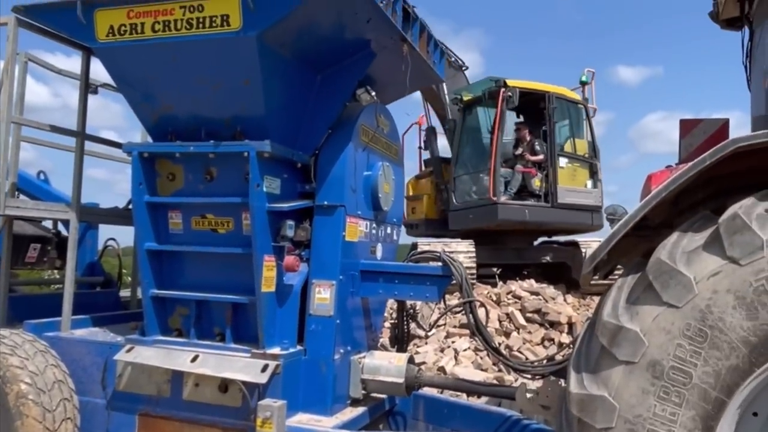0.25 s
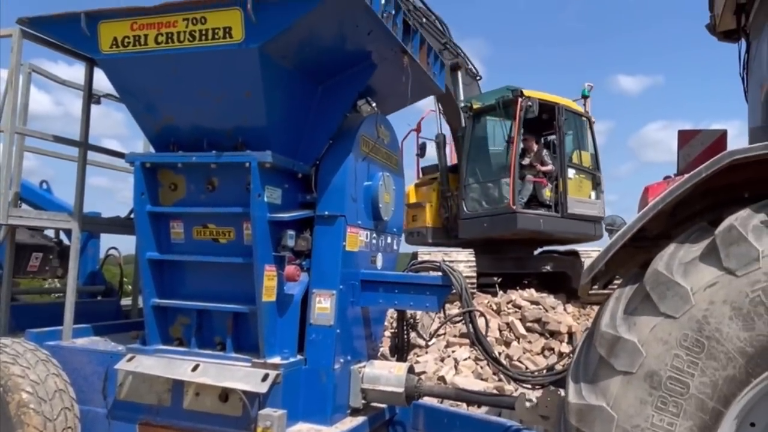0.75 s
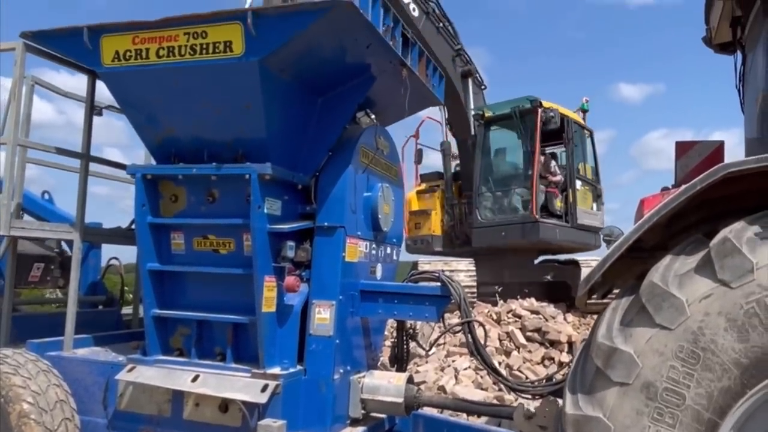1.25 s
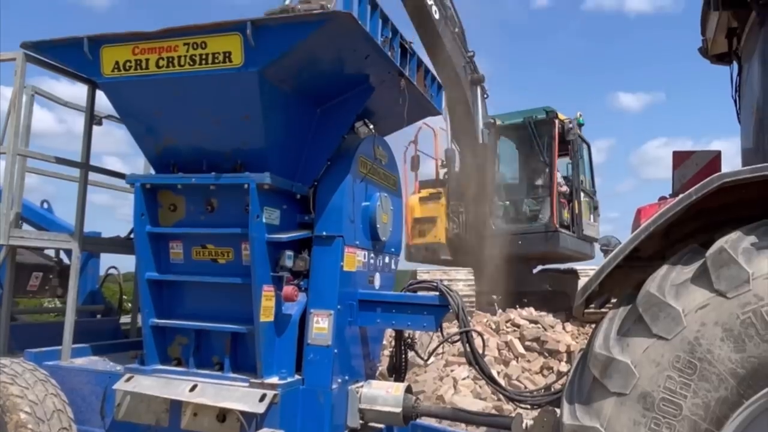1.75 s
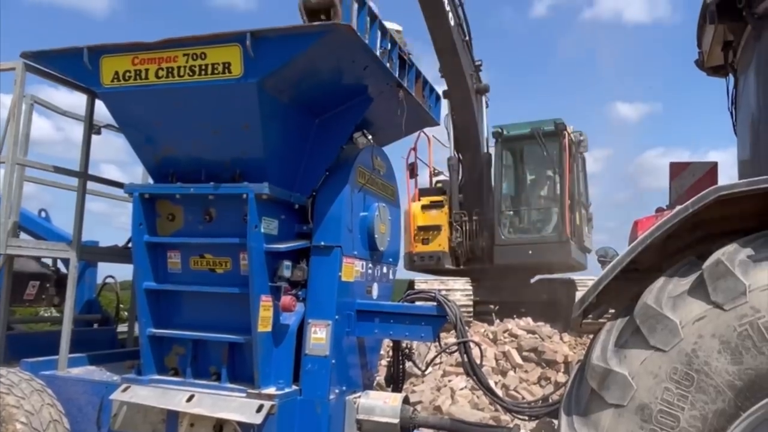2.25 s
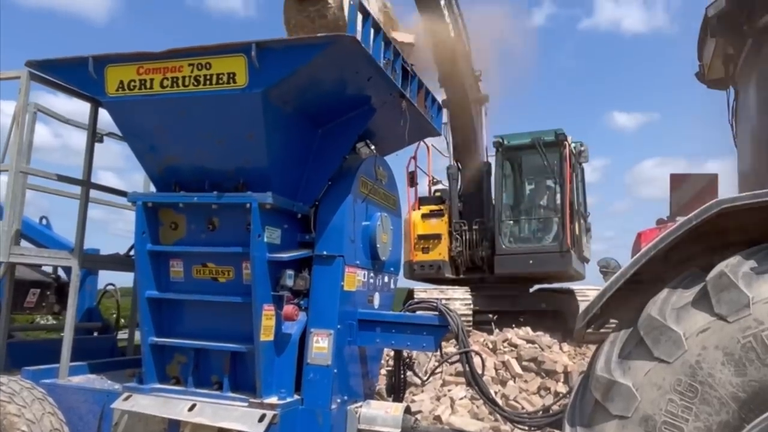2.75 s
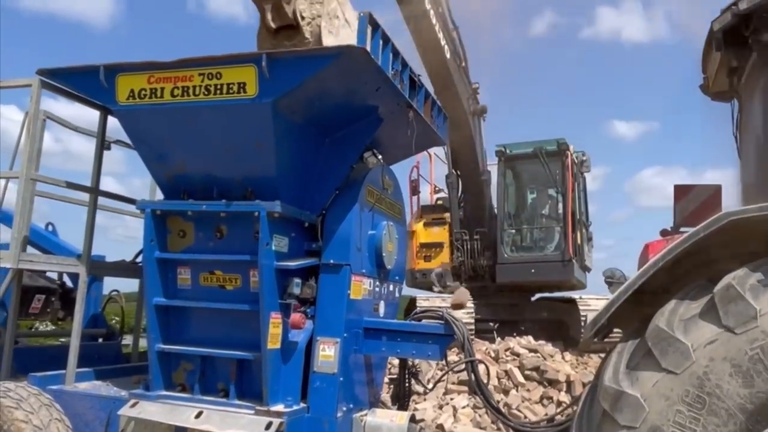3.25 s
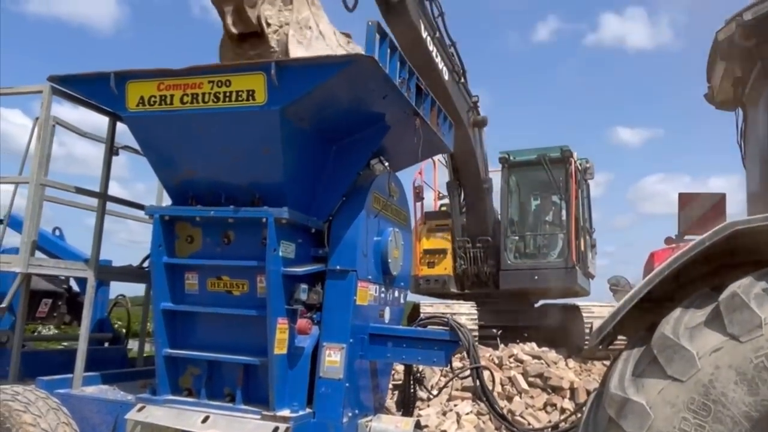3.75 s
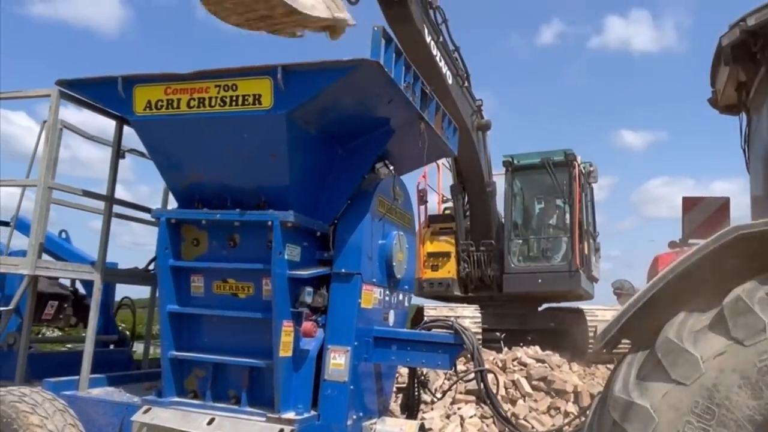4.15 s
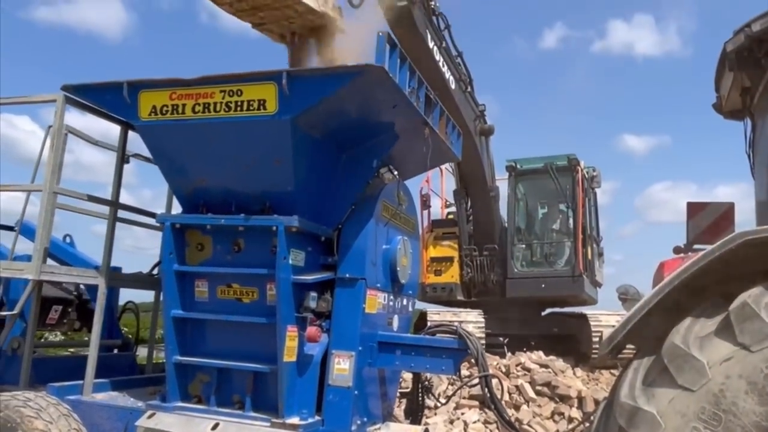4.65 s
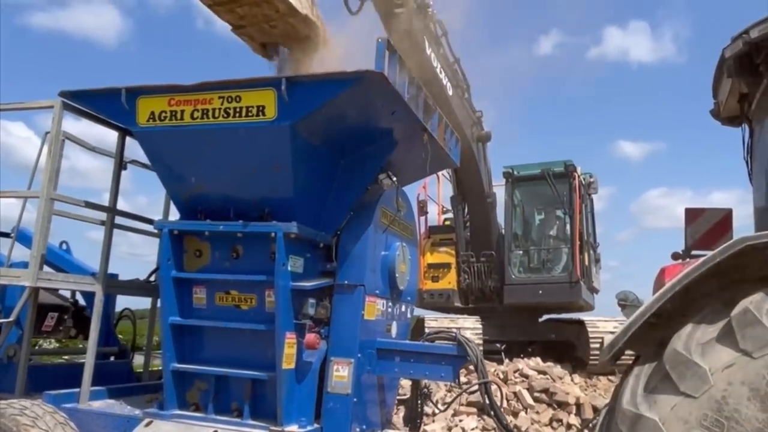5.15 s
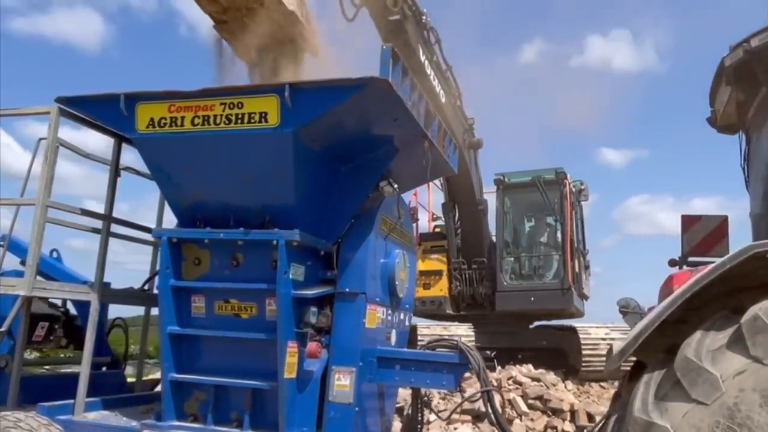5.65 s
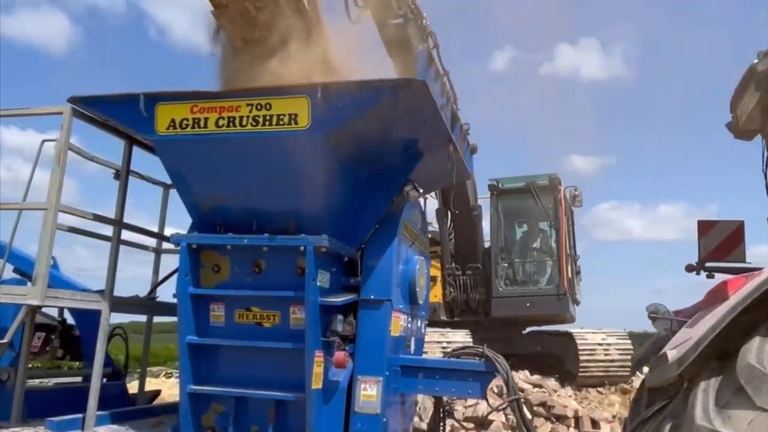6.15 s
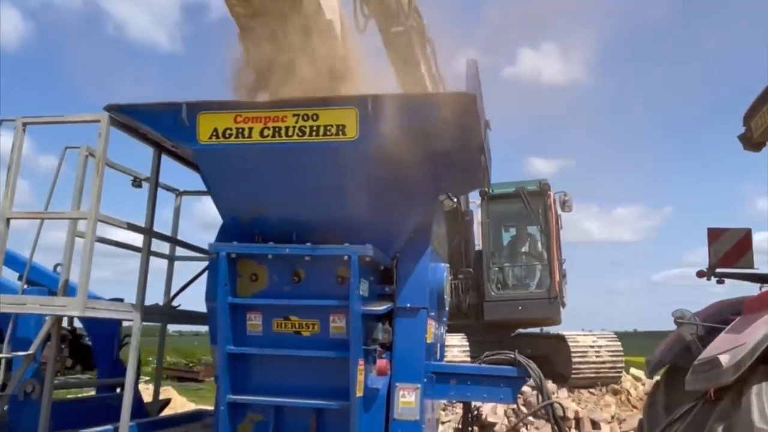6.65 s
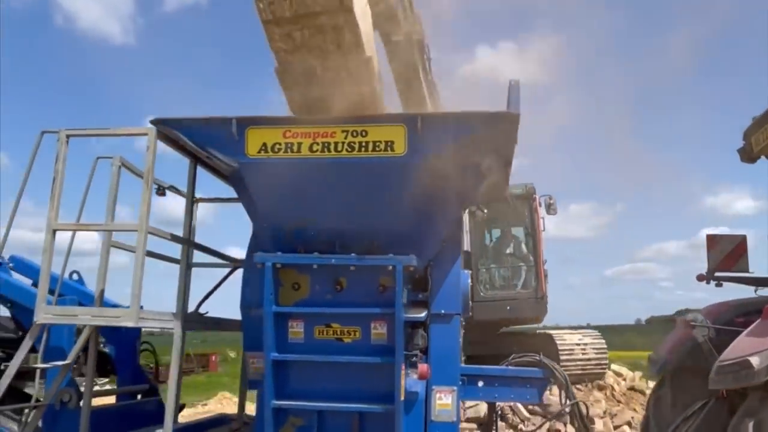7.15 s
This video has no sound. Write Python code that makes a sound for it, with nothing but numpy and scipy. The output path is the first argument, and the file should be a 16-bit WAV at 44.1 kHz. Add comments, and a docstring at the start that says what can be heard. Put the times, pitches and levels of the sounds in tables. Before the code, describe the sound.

Close outdoor stereo capture of a tractor-driven crusher in a farmyard. Engine drone and humming steel frame underlie grinding, dull thuds and splintering stone in a quick regular beat. An excavator bucket adds rubble: sharp stone-on-steel clangs near three seconds, scattered cracks and grit afterwards, then a thicker pour and two short metallic booms late on, as the chamber rumble thins out.

```python
"""A diesel drones and throbs as a tractor-driven crusher chews stone and brick rubble in a farmyard.
Rubble churns in the steel chamber and bursts at strokes of the jaw: noise shaped by collisions and resonances.
An excavator refills the hopper: grit patters in, stones crack against the steel, chips tick and a stone squeaks.
Two heavy blocks set the hopper walls booming in decaying modes. All is heard through two close microphone ports."""
import sys
import numpy as np
from scipy import signal
from scipy.fft import rfft, irfft, next_fast_len
from scipy.io import wavfile

SR = 44100
rng = np.random.default_rng(int(sys.argv[2]) if len(sys.argv) > 2 else 0)


def master(y):
    """Save y as 16-bit WAV."""
    cut = np.clip(np.atleast_2d(y).T, -1, 1)
    pcm = np.round(cut * 32767)  # scale
    wavfile.write(sys.argv[1], SR, pcm.astype(np.int16))


N = 326781
TIME = np.arange(N) / SR  # seconds
BINS = np.fft.rfftfreq(8192, 1 / SR)  # Hz, grid on which colours are drawn
FIRST_CLOSE_S, STROKE_S = .095, .2138  # the jaw closes at a steady beat

# load in the chamber: (time [s], relative frame rumble [dB], relative grinding [dB])
LOAD_CURVE = [(0, -24, -24), (1.1, -24, -27), (2.35, -23.5, -25), (2.95, -27.5, -26.5), (3.3, -33.5, -29),
              (3.75, -29, -28), (4.2, -33, -33.5), (4.48, -28.5, -27), (4.72, -24, -25), (5.7, -24.5, -27),
              (6.3, -22.5, -25.5), (6.58, -28, -23), (6.82, -35, -28.5), (7.0, -34.5, -29),
              (7.41, -43, -27)]
# grit pouring from the bucket: (time [s], relative level [dB])
POUR_CURVE = [(0, -40.5), (1.1, -43), (2.55, -41.5), (3.07, -46.5), (3.29, -40), (3.38, -38), (3.95, -48),
              (4.27, -49.5), (4.72, -41.5), (4.85, -35.5), (5.2, -37), (5.55, -42), (6.12, -40),
              (6.28, -30.5), (6.48, -37), (6.68, -34), (6.85, -52), (7.12, -37), (7.41, -44)]
# resonances of the crushing chamber: (frequency [Hz], width [Hz], lift [dB])
CHAMBER_MODES = [(129, 12, 3), (160, 14, -3), (186, 12, 5), (250, 16, -3), (284, 22, 4), (325, 14, 3),
                 (345, 16, -3), (374, 18, 2), (405, 14, -3), (432, 14, 3), (460, 16, -2), (502, 36, 6),
                 (925, 24, -4), (965, 20, -3), (716, 10, 6), (825, 16, 4), (884, 30, 7), (1040, 40, 2),
                 (1378, 30, 3), (1445, 30, 3), (2851, 40, 4), (3009, 25, 4), (3193, 28, 4), (3521, 40, 4),
                 (4240, 40, 4), (4694, 55, 5), (5954, 110, 3), (10609, 80, 3)]
STEEL_DB = sum(db / (1 + (2 * (BINS - hz) / width) ** 2) for hz, width, db in CHAMBER_MODES)


def amp(db):
    """Level to amplitude: 20 dB is a factor of ten."""
    return 10 ** (np.asarray(db) / 20)


def evened(x):
    """Normalization: scales a signal to an rms of one."""
    return x / np.sqrt(np.mean(x ** 2) + 1e-20)


def read(points, hz):
    """Interpolates a spectrum linearly on a log-frequency axis."""
    f, value = np.transpose(points)
    return np.interp(np.log(hz + 1), np.log(f + 1), value)


def follow(rows, column=1):
    """Interpolates one column of a time curve at every sample."""
    rows = np.asarray(rows)
    return np.interp(TIME, rows[:, 0], rows[:, column])


def add(mix, s, sound):
    """Superposition: adds a sound to the mix from time s."""
    part = mix[..., max(round(s * SR), 0):][..., :sound.shape[-1]]
    part += sound[..., :part.shape[-1]]


def dying(t, t60):
    """Free decay: amplitude falls exponentially by 60 dB in t60 seconds."""
    return np.exp(-np.log(1000) * np.maximum(t, 0) / max(t60, .005))


def wander(top_hz, count=1024):
    """Low-passed random fluctuation with an rms of one, weak above top_hz."""
    length = N / SR
    low_pass = 1 + (np.fft.rfftfreq(count, length / count) / top_hz) ** 4
    slow = irfft(rfft(rng.standard_normal(count)) / low_pass)
    return np.interp(TIME, np.linspace(0, length, count), evened(slow))


def impacts(per_s, spread_db, t60):
    """Shot noise: power (mean one) of random collisions of unequal size, each decaying exponentially."""
    sizes = amp(spread_db * np.minimum(rng.exponential(1, N), 4))
    hits = (rng.random(N) < per_s / SR) * sizes ** 2
    power = signal.lfilter([1], [1, -amp(-60 / (t60 * SR)) ** 2], hits)
    return power / power.mean()


def rattle(power, spectrum, lift_db):
    """Source and filter: independent noise at both ports follows a power curve through a causal resonant filter."""
    # folding the cepstrum gives the minimum-phase response
    cepstrum = irfft(np.log(amp(read(spectrum, BINS) + lift_db)))
    half = len(BINS) - 1
    cepstrum[1:half] *= 2
    cepstrum[half + 1:] = 0
    response = irfft(np.exp(rfft(cepstrum)))[:half]
    response /= np.linalg.norm(response)
    noise = rng.standard_normal((2, len(power))) * np.sqrt(np.maximum(power, 0))
    return signal.oaconvolve(noise, response[None], axes=1)[:, :len(power)]


def stone_ring(count=16):
    """Local resonance: every stone and the spot it hits lift a few bands of their own, in dB over frequency."""
    edges = np.geomspace(700, 13000, count + 1)
    lift_db, sharpness = 11.5, 30  # greatest lift; Q of each resonance
    centres = rng.uniform(edges[:-1], edges[1:])
    return sum(lift_db * rng.random() / (1 + (2 * sharpness * (BINS / hz - 1)) ** 2) for hz in centres)


def struck(modes, s, level_db, rise_s):
    """Modal superposition: a steel part rings in decaying sines after one blow."""
    t, out = np.arange(SR) / SR, np.zeros(N)
    ring = sum(amp(db) * dying(t, t60) * np.sin(2 * np.pi * (hz * t + rng.random())) for hz, db, t60 in modes)
    add(out, s, amp(level_db) * ring * (1 - np.exp(-t / rise_s)))
    return out


def clacks(low_hz, high_hz, per_s, spread_db, cycles, tilt, count=11):
    """Size scaling: colliding stones clack in three short modes, the big ones lower and louder."""
    t, out = np.arange(SR // 10) / SR, np.zeros((2, N))
    for hz in np.geomspace(low_hz, high_hz, count):
        sizes = amp(spread_db * np.minimum(rng.exponential(1, N), 3))
        hits = sizes * (rng.random(N) < per_s / SR)  # per_s holds for each size
        modes = hz * np.array([1, rng.uniform(1.2, 1.5), rng.uniform(1.6, 2.1)])[:, None, None]
        # the upper modes are weaker; each port has its own phases
        ring = (np.sin(2 * np.pi * (modes * t + rng.random((3, 2, 1)))) * hz / modes).sum(0)
        ring *= dying(t, cycles / hz) * (1 - dying(t, .003))
        out += evened(signal.oaconvolve(hits[None], ring, axes=1)[:, :N]) / hz ** tilt
    return evened(out)


def jaw(lead_s):
    """Harmonic motion: the jaw's swing lead_s ahead, 1 when closed and -1 when open."""
    return np.cos(2 * np.pi * (TIME + lead_s - FIRST_CLOSE_S) / STROKE_S)


def diesel(level_db=-2.5, jitter=0.013, overtone_flutter_db=3, throb_db=2.0, sag=0.033):
    """Fourier synthesis: exhaust overtones of an uneven firing rate throb and sag as the jaw loads the engine."""
    # firing rate before jitter and sag: (time [s], frequency [Hz])
    firing_curve = [(0, 48.43), (.9, 48.15), (1.3, 47.54), (2.1, 48.64), (3.4, 48.74), (3.9, 47.6),
                    (4.9, 48.4), (5.5, 46.37), (6.4, 47.9), (7.41, 47)]
    # exhaust drone: (time [s], relative level [dB])
    drone_curve = [(0, -24), (.28, -24), (.6, -26), (2.1, -28.5), (2.55, -27), (2.97, -29), (3.07, -43),
                   (3.65, -32), (4.8, -29), (6.55, -28), (6.79, -38), (7.14, -30.5), (7.41, -30)]
    # partials of the firing tone: (multiple of firing rate [-], relative level [dB])
    partials = [(1, 1.5), (1.5, -21), (2, -8.5), (2.5, -34), (3, -8.5), (4, -21.5), (6, -33)]
    firing_flutter_db = 1.6
    unevenness = 1 + jitter * wander(top_hz=9.9) - sag * jaw(lead_s=0.035)
    phase = 2 * np.pi * np.cumsum(follow(firing_curve) * unevenness) / SR
    tone = np.zeros(N)
    for multiple, db in partials:
        half_orders = round(2 * multiple)
        flutter_db = firing_flutter_db if half_orders == 2 else overtone_flutter_db
        gain = amp(db + flutter_db * wander(top_hz=9.3))
        tone += gain * np.sin(half_orders / 2 * phase + 2 * np.pi * rng.random())
    return amp(follow(drone_curve) + level_db + throb_db * jaw(lead_s=0.064)) * np.sqrt(2) * tone


def churn(rumble_db=1.5, grind_db=0, frame_steel=0.75, wall_steel=0.95, squeeze_db=1.0):
    """Random excitation: tumbling rubble shakes the frame and grinds along the walls, harder as the jaw closes."""
    # colour of the frame's rumble: (frequency [Hz], density [dB per Hz])
    rumble_colour = [(15, -32), (35, -16), (60, -1.5), (85, 4.5), (130, 3), (190, -4), (260, -11),
                     (400, -16.5), (1000, -73)]
    # colour of grinding on the walls: (frequency [Hz], density [dB per Hz])
    grind_colour = [(100, -21), (200, 3), (290, 1), (500, -3.5), (620, -6), (1000, -5.5), (1500, -12.5),
                    (2400, -17.5), (3400, -31.5), (6000, -34), (16000, -72)]
    rumble_gain = amp(follow(LOAD_CURVE, column=1) + rumble_db)
    rumble = rumble_gain ** 2 * impacts(per_s=110, spread_db=-0.5, t60=0.1)
    grind_gain = amp(follow(LOAD_CURVE, column=2) + grind_db + squeeze_db * jaw(lead_s=0.0079))
    grind = grind_gain ** 2 * impacts(per_s=530, spread_db=0.5, t60=0.48)
    shaking = rattle(rumble, rumble_colour, frame_steel * STEEL_DB)
    return shaking + rattle(grind, grind_colour, wall_steel * STEEL_DB)


def frame(level_db=0, waver=0.58):
    """Sustained resonance: shaking keeps the frame humming in lightly damped modes that waver in level and phase."""
    # modes of the frame: (frequency [Hz], relative level [dB])
    frame_modes = [(75, -11), (105, -10.5), (120, -16.5), (131, -10.5), (148, -10), (170, -14), (186, -9),
                   (296, -13.5), (328, -18.5), (387, -15.5), (433, -13.5), (480, -22), (506, -17)]
    hum = np.zeros(N)
    for hz, db in frame_modes:
        envelope = 1 + waver * (wander(top_hz=3.1) + 1j * wander(top_hz=2.3))
        hum += amp(db) * (envelope * np.exp(2j * np.pi * (hz * TIME + rng.random()))).real
    return amp(follow(LOAD_CURVE, column=1) + level_db) * hum


def pebbles(level_db=-9.5):
    """Discrete collisions: single pebbles clack as they bounce out of the mass in the chamber."""
    clacking = clacks(low_hz=649, high_hz=2600, per_s=7, spread_db=2.0, cycles=53, tilt=1.0)
    return amp(follow(LOAD_CURVE, column=2) + level_db) * clacking


def pour(level_db=4.0, steel=0.15, gravel_db=-5.5):
    """Granular excitation: sand and chips patter on the hopper's steel while gravel clacks among them."""
    # colour of grit on steel: (frequency [Hz], density [dB per Hz])
    grit_colour = [(800, -14.5), (2000, 4.5), (2900, 7), (3400, 0.5), (5500, 2.5), (6600, -3), (9000, -3),
                   (11000, -7.5), (12800, -11.5), (16000, -17)]
    grains = impacts(per_s=1500, spread_db=1.5, t60=0.055)
    gravel = clacks(low_hz=1400, high_hz=5000, per_s=6, spread_db=2.5, cycles=70, tilt=.5, count=16)
    gain = amp(follow(POUR_CURVE) + level_db)
    return rattle(gain ** 2 * grains, grit_colour, steel * STEEL_DB) + gain * amp(gravel_db) * gravel


def hopper(hum_db=-4):
    """Modal response: blocks boom the wall, stones clang on the rim, and pouring grit keeps the wall humming."""
    # blocks landing on the wall: (time [s], level [dB], rise time constant [s])
    blocks = [(6.626, -13, 0.0043), (7.121, -14, 0.0038)]
    # modes of the wall: (frequency [Hz], relative level [dB], t60 [s])
    wall_modes = [(168.6, -3, 1.27), (176.3, -5, 0.66), (196.6, 8.5, 0.17), (214.8, 1, 0.52),
                  (264, -8, 1.24), (276, -9.5, 1.1), (331, -15, 2.3), (419, -4, 0.56), (487, -18, 0.62),
                  (560, -7, 0.18), (600, -3, .3), (684, -7.5, 0.52), (910, -11, 0.44), (950, -30, 1.6),
                  (1000, -23, 1.1), (1085, -14, 0.32)]
    # stones clanging on the rim: (time [s], level [dB])
    clangs = [(2.949, -13.5), (2.957, -22), (3.152, -21), (3.172, -24), (3.447, -29), (7.146, -27)]
    # modes of the rim: (frequency [Hz], relative level [dB], t60 [s])
    rim_modes = [(862, 1, .12), (922, -1, 0.12), (1167, 1, 0.077), (1250, -4, 0.07), (1370, 0, 0.054),
                 (1450, -7, 0.12), (1543, -4, 0.15), (1650, -1, 0.09), (2070, -10, 0.15), (2568, -12, 0.13),
                 (2780, -21, 0.22), (3220, -15, .22), (3440, -5, .1), (6089, -20, .12)]
    # long-lived panel tones stirred by the pour: (frequency [Hz], relative level [dB])
    panel_tones = [(186, 9.5), (283, 0.5), (371, 3), (716, -17), (887, 5)]
    booms = sum(struck(wall_modes, s, db, rise_s=rise) for s, db, rise in blocks)
    clang = sum(struck(rim_modes, s, db, rise_s=0.0003) for s, db in clangs)
    hum = sum(amp(db) * wander(top_hz=3.7) * np.sin(2 * np.pi * hz * TIME) for hz, db in panel_tones)
    return booms + clang + amp(follow(POUR_CURVE) + hum_db) * hum


def bursts(steel=1.0):
    """Brittle failure: crushed lumps and dropped heaps give swelling fracture volleys that ring on in the chamber."""
    # lumps bursting as the jaw closes, with relative levels:
    # (stroke number [-], squeeze before closing [s], thud [dB], crunch [dB], splinter [dB])
    bites = [(0, .055, -35, -20, -24.5), (1, .02, -15, -13.5, -25), (2, .06, -25, -14.5, -23.5),
             (3, .04, -22.5, -21.5, -31), (4, .035, -19, -21.5, -32), (6, .025, -20, -14.5, -37),
             (7, .032, -20.5, -13, -23), (8, 0.091, -36, -23.5, -37), (9, .03, -24, -11.5, -22.5),
             (10, .03, -25, -11.5, -26), (11, .08, -20, -20.5, -31), (12, .05, -17.5, -11.5, -22),
             (13, .05, -26, -15.5, -26), (16, .07, -23, -19.5, -22.5), (17, .04, -20, -17, -22.5),
             (19, 0.065, -25, -25.5, -31), (21, .045, -12, -15, -19.5), (22, 0.046, -18, -20, -31),
             (23, 0.036, -34, -22.5, -32), (24, 0.029, -22.5, -15.5, -21), (25, .026, -14, -10.5, -19.5),
             (26, .044, -22, -18, -24), (27, .025, -25, -23, -29), (28, 0.052, -15.5, -19.5, -32),
             (29, .08, -17.5, -17, -22.5), (30, .036, -19, -14.5, -39), (32, 0.046, -30, -35, -34),
             (33, .085, -33, -29, -32)]
    # heaps of rubble dropping from the bucket, with relative levels:
    # (time [s], collapse [s], thud [dB], crunch [dB], splinter [dB])
    heaps = [(2.949, 0.046, -25, -13, -16.5), (6.346, 0.023, -23, -17, -16),
             (6.625, 0.017, -25, -11.5, -17.5), (7.121, 0.038, -29, -22.5, -16),
             (7.25, 0.033, -23, -19, -29)]
    # colours of thud, crunch and splintering: each (frequency [Hz], density [dB per Hz])
    thud_colour = [(30, -46.5), (60, -3), (90, 1), (190, 0), (250, -8.5), (400, -27.5), (1000, -53)]
    crunch_colour = [(120, -22.5), (180, -5), (270, -1), (480, 3.5), (640, -1.5), (880, -12.5),
                     (1300, -25.5), (4000, -50)]
    splinter_colour = [(400, -12.5), (950, 5.5), (1400, -1.5), (2000, -2), (2500, -4), (3200, -10.5),
                       (5500, -20), (9000, -42), (16000, -51)]
    t, out = np.arange(SR // 2) / SR, np.zeros((2, N))
    fractures = impacts(per_s=900, spread_db=-1.0, t60=0.067)

    def volley(db, length, t60, first):
        """Energy release: power grows from a first fraction of full amplitude, then decays after length seconds."""
        swell = first + (1 - first) * np.minimum(2 * t / length, 1)
        return (amp(db) * swell * dying(t - length, t60)) ** 2

    events = [(FIRST_CLOSE_S + round(stroke) * STROKE_S - squeeze, squeeze, *levels)
              for stroke, squeeze, *levels in bites]
    for s, length, thud_db, crunch_db, splinter_db in events + list(heaps):
        grains = np.roll(fractures, -round(s * SR))[:len(t)]
        ring_db = steel * STEEL_DB + stone_ring()
        thud = volley(thud_db - .3, length, t60=0.21, first=0.27)
        crunch = volley(crunch_db - 3.5, length, t60=0.38, first=0.67) * grains
        splinter = volley(splinter_db - 2.0, length, t60=0.28, first=0.73) * grains
        add(out, s, rattle(thud, thud_colour, ring_db))
        add(out, s, rattle(crunch, crunch_colour, ring_db))
        add(out, s, rattle(splinter, splinter_colour, ring_db))
    return out


def chips(octave_db=-10, per_s=10, faint_db=7, spread_db=3):
    """Impulsive fracture: flakes tick, each brightest at its own pitch; fainter random ones follow the grit's level."""
    # chips snapping off: (time [s], level [dB], brightest frequency [Hz])
    loud = [(.150, -28, 9000), (.486, -28, 9000), (.621, -19.5, 4000), (.750, -27.5, 5000),
            (.805, -28, 4000), (.909, -30, 3700), (1.043, -21.5, 3000), (1.145, -32, 3000),
            (1.204, -32, 3800), (1.551, -24, 2980), (1.676, -35, 3500), (1.713, -26, 7070),
            (1.850, -24.5, 6030), (1.874, -26, 4000), (2.013, -29, 5000), (2.095, -27, 10000),
            (2.112, -24, 10560), (2.129, -29, 3500), (2.309, -29, 9440), (2.557, -24, 3000),
            (2.575, -24, 5000), (3.565, -14, 8950), (3.586, -21, 4000), (3.713, -20.5, 10000),
            (3.775, -38, 8000), (3.833, -26, 5000), (4.147, -23, 8360), (4.748, -28, 4000),
            (5.609, -37, 4990), (6.687, -18, 8000), (6.834, -24, 6000)]
    # colour of a snapping flake: (frequency [Hz], density [dB per Hz])
    flake_colour = [(1000, -3), (6000, 0.5), (9000, 2.5), (11000, -9), (13000, -13), (16000, -14)]
    t, out = np.arange(SR // 12) / SR, np.zeros((2, N))
    rise_s, t60 = 0.00049, 0.028
    shape = (1 - np.exp(-t / rise_s)) * dying(t, t60)
    grit_db = follow(POUR_CURVE)
    faint = []
    for s, size, pitch in rng.random((int(per_s * N / SR), 3)) * [N / SR, 1, 1]:
        db = grit_db[int(s * SR)] + faint_db + spread_db * (2 * size - 1)
        faint.append((s, db, 2000 * 5 ** pitch))  # 2 to 10 kHz
    for s, db, hz in list(loud) + faint:
        hump_db = np.maximum(octave_db * np.log2((BINS + 1) / hz) ** 2, -50)
        add(out, s, rattle((amp(db) * shape) ** 2, flake_colour, hump_db + stone_ring()))
    return out


def snaps(level_db=0, octave_db=-3.0, rise_s=0.0016, t60=0.15, steel=1.0):
    """Sudden fracture: a lump splits at once deep in the chamber, a dense hard knock with little treble."""
    # splitting lumps: (time [s], level [dB], hold before decay [s], centre of emphasis [Hz])
    splits = [(.281, -16.5, .014, 1900), (0.452, -20, 0.013, 1700), (0.487, -17.5, 0.015, 1100),
              (1.568, -25.5, 0.012, 520), (1.987, -22.5, 0.025, 900), (2.197, -22.5, 0.01, 1390),
              (2.587, -19.5, 0.0093, 1300), (2.639, -19.5, 0.022, 1000), (2.814, -23, 0.012, 1498),
              (2.846, -26, .008, 1500), (3.67, -23, 0.033, 1800), (4.538, -19.5, .02, 894),
              (5.413, -18, 0.024, 800), (6.212, -23, .014, 1400), (6.262, -26, 0.022, 1400),
              (6.352, -35, .025, 910), (7.127, -18, 0.022, 860), (7.203, -22, 0.042, 1000),
              (7.268, -18.5, 0.048, 520)]
    # colour muffled by the chamber: (frequency [Hz], density [dB per Hz])
    snap_colour = [(150, -11), (300, 1.5), (500, 3), (750, 3), (1500, -3), (2550, -3.5), (2950, -15),
                   (4000, -19), (8000, -32), (16000, -50)]
    t, out = np.arange(SR // 4) / SR, np.zeros((2, N))
    fractures = impacts(per_s=1300, spread_db=0, t60=0.038)
    for s, db, hold, hz in splits:
        grains = np.roll(fractures, -round(s * SR))[:len(t)]
        shape = (1 - np.exp(-t / rise_s)) * dying(t - hold, t60)
        hump_db = np.maximum(octave_db * np.log2((BINS + 1) / hz) ** 2, -40)
        ring_db = hump_db + steel * STEEL_DB + stone_ring()
        add(out, s, rattle((amp(db + level_db) * shape) ** 2 * grains, snap_colour, ring_db))
    return out


def strikes(crack_db=2.5, knock_db=-3.3, knock_t60=1.77, rise_s=0.0006, snap=0.17, snap_t60=0.007, chip_tilt=0.76):
    """Impact radiation: stones hit steel and stone with a sharp crack over a longer, duller knock."""
    # stones landing in the open hopper, with relative levels: (time [s], crack [dB], knock [dB],
    # crack t60 [s], clatter before decay [s], centre of favoured range [Hz])
    stones = [(.338, -37, -24.5, 0.17, .004, 3700), (1.044, -44, -30, .04, .003, 2400),
              (1.142, -49, -26.5, .04, .003, 1700), (2.557, -40, -28, 0.039, .003, 2300),
              (2.950, -25, -18.5, 0.11, 0.0073, 1350), (3.013, -14.5, -12, 0.044, 0.0086, 4700),
              (3.028, -26, -17.5, 0.14, 0.016, 2600), (3.150, -22.5, -14, 0.26, 0.018, 1300),
              (3.317, -22, -27, 0.1, 0.0044, 4380), (3.360, -39, -22, 0.066, 0.01, 1890),
              (3.391, -32.5, -33, .4, .018, 6000), (3.447, -26.5, -16, 0.15, 0.023, 1210),
              (3.487, -46, -21, 0.15, 0.0073, 1890), (4.130, -44, -35, .1, 0.0062, 1900),
              (4.564, -32, -21, 0.21, .008, 1700), (4.745, -42, -25, 0.076, .004, 2200),
              (4.796, -29, -23.5, .08, .004, 2420), (4.883, -26.5, -42, 0.18, .004, 5800),
              (5.089, -27.5, -15.5, 0.14, 0.014, 2250), (5.146, -30, -17.5, .14, 0.023, 2450),
              (5.225, -30, -40, 0.15, 0.014, 5800), (5.359, -29, -34, 0.12, .012, 5900),
              (5.893, -35.5, -39, 0.16, 0.014, 10000), (6.041, -37.5, -31, .17, .008, 9500),
              (6.135, -24.5, -25.5, 0.17, 0.0092, 5550), (6.347, -25.5, -25, 0.24, 0.022, 5500),
              (6.366, -34, -20, .05, .004, 1700), (6.520, -32, -22.5, 0.093, .006, 2000),
              (6.591, -37, -23.5, 0.38, .012, 1700), (6.687, -20.5, -15, .17, 0.0068, 5600),
              (6.834, -36.5, -37.5, 0.72, .004, 4570), (6.901, -36, -19, 0.1, 0.0076, 2320),
              (7.124, -30, -26, .08, .004, 5000), (7.145, -23, -14.5, 0.14, 0.006, 1900)]
    # colours of crack and knock: each (frequency [Hz], density [dB per Hz])
    crack_colour = [(800, -59), (2500, -6.5), (4000, 1), (6200, 2), (7600, 2), (9000, -1), (11000, -4.5),
                    (12800, -11), (16000, -22)]
    knock_colour = [(200, -32), (600, 3.5), (1000, 6), (1600, 3), (2800, 2), (4000, -10), (7000, -13.5),
                    (16000, -63)]
    t, out = np.arange(SR // 4) / SR, np.zeros((2, N))
    attack = (1 - np.exp(-t / rise_s)) * (1 + snap * dying(t, snap_t60))
    fragments = impacts(per_s=2400, spread_db=1, t60=.016)
    octaves = np.log2(np.clip(BINS, 2500, 11000) / 5000)
    note_db, note_width = 4.5, .3  # lift of the favoured range; half-width as a fraction of its centre
    for s, db, body_db, t60, clatter, hz in stones:
        grains = np.roll(fragments, -round(s * SR))[:len(t)]
        note = note_db / (1 + ((BINS / hz - 1) / note_width) ** 2)
        ring_db = 0.66 * STEEL_DB + stone_ring() + note
        bright_db = chip_tilt * (db - body_db) * octaves  # light stones, with little knock, crack highest
        crack = (amp(db + crack_db) * attack * dying(t - clatter, t60)) ** 2 * grains
        knock = (amp(body_db + knock_db) * attack * dying(t - clatter, t60 * knock_t60)) ** 2 * grains
        add(out, s, rattle(crack, crack_colour, ring_db + bright_db))
        add(out, s, rattle(knock, knock_colour, ring_db))
    return out


def squeak(s=2.098, length=0.044, hz=1890, level_db=-29):
    """Frictional vibration: a stone skids briefly on steel, heard as a short pure tone."""
    t, out = np.arange(int(length * SR)) / SR, np.zeros(N)
    add(out, s, amp(level_db) * np.sin(2 * np.pi * hz * t) * signal.windows.tukey(len(t), .5))
    return out


def ports(diffuse, direct, overhead):
    """Partial coherence: two ports share part of each sound, with phase and level differences over frequency."""
    # likeness of the ports: (frequency [Hz], coherent fraction of amplitude [-])
    likeness = [(60, .92), (380, .95), (650, .75), (1100, .85), (1800, .8), (2400, .7), (3200, .4),
                (4200, .5), (5500, .66), (6500, .75), (7100, .99), (8000, .99), (8500, .76), (9700, .72),
                (10600, .95), (11800, .95), (12600, .5), (13400, .98)]
    # phase by which left leads: (frequency [Hz], lead [rad])
    lead = [(60, 0), (150, -.1), (380, .39), (620, 1.53), (1100, .7), (1900, .65), (2500, 1.5), (3200, 2.7),
            (4400, 2.1), (5200, 1.25), (6000, 1.5), (7100, 3.0), (8000, 3.3), (9300, 4.3), (10500, 6.1),
            (12000, 6.5), (13300, 9.3), (16000, 9.5)]
    # left minus right: (frequency [Hz], level difference [dB])
    tilt = [(60, 3), (110, -4.5), (200, -7), (380, -10), (700, -2.5), (1290, 0.5), (2380, 0.5), (4400, 0.5),
            (8120, 1), (15000, -1.5)]
    # the hopper's mouth lies more squarely ahead: (frequency [Hz], reduction of left's lead [rad])
    squarer = [(1500, 0), (2400, .4), (3200, 1.5), (4400, .8), (5200, .3), (6000, 0)]
    size = next_fast_len(N + SR // 4)
    hz = np.fft.rfftfreq(size, 1 / SR)
    (a, b), both, (c, d) = rfft(diffuse, size), rfft(direct, size), rfft(overhead, size)
    same = np.clip(read(likeness, hz), 0, 1)
    apart = np.sqrt(1 - same ** 2)
    side = amp(read(tilt, hz) / 2)
    above = np.exp(1j * read(squarer, hz))
    left = a + both + c
    right = same * a + apart * b + both + (same * c + apart * d) * above
    right = right * np.exp(-1j * read(lead, hz))
    return irfft(np.array([left * side, right / side]), size)[:, :N]


def scene():
    """Superposition of engine, crusher and falling rubble at the two ports."""
    direct = diesel() + frame() + hopper() + squeak()
    diffuse = churn() + pebbles() + pour() + bursts() + chips() + snaps()
    return ports(diffuse, direct, overhead=strikes())


def record(dry):
    """Soft saturation rounds off the loudest peaks; a low-pass filter then limits the band."""
    edge_hz = 15850
    held = dry / (1 + dry ** 8) ** (1 / 8)
    low_pass = signal.firwin(511, edge_hz, window=("kaiser", 9), fs=SR)
    return signal.oaconvolve(held, low_pass[None], "same")


dry = scene()
out = record(dry)
master(out)
```